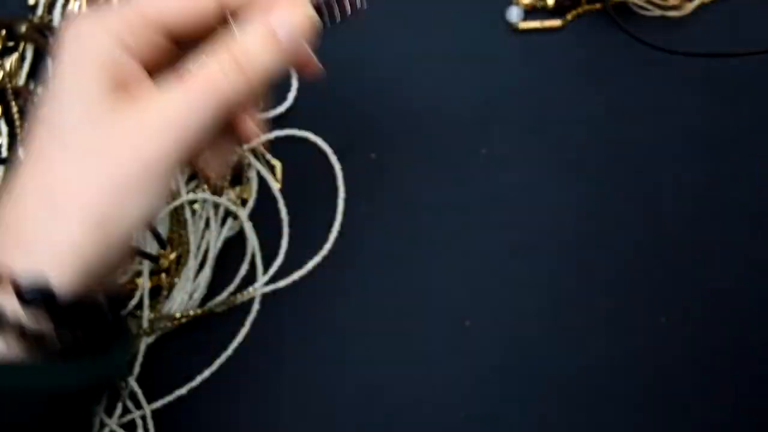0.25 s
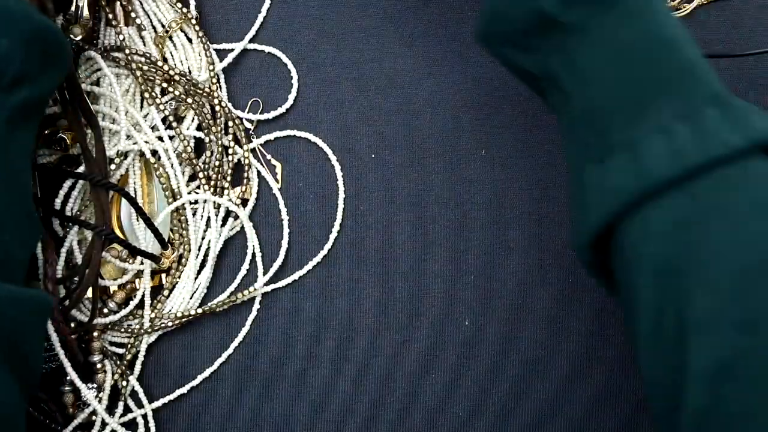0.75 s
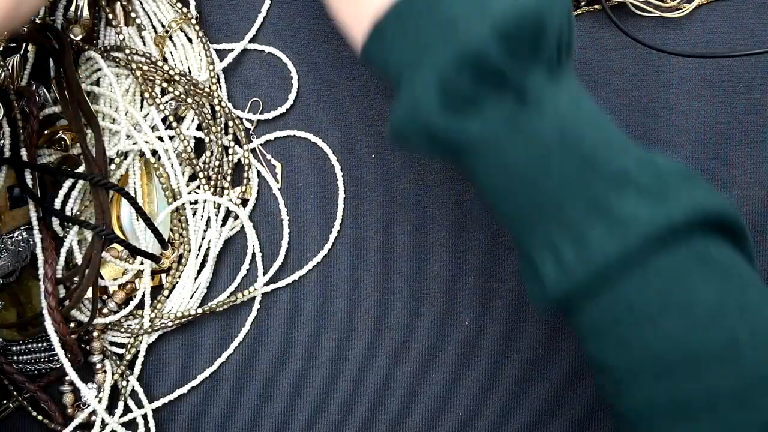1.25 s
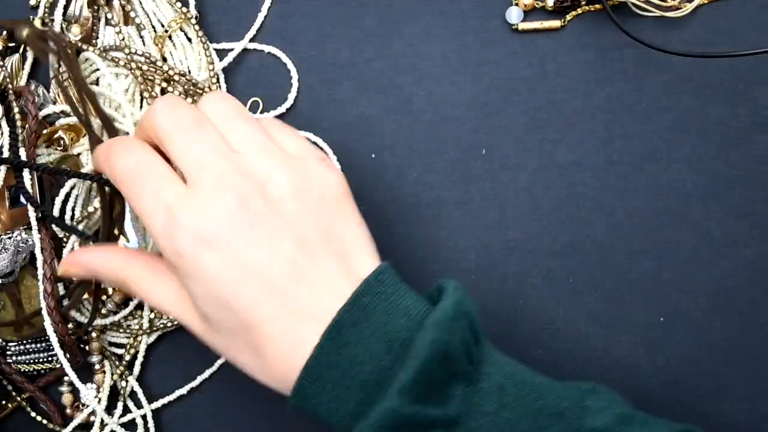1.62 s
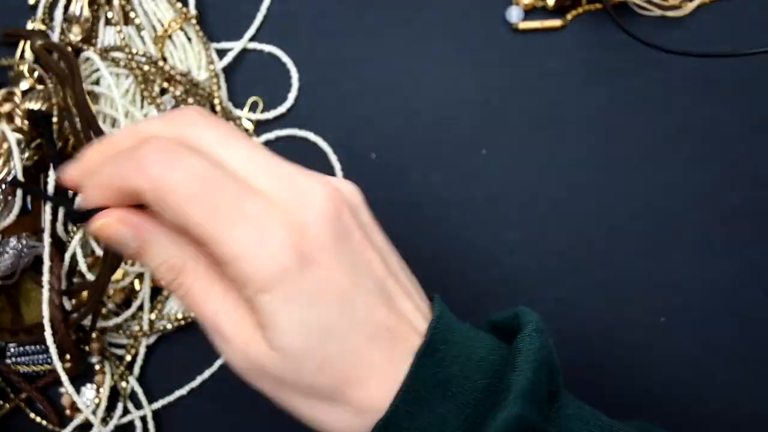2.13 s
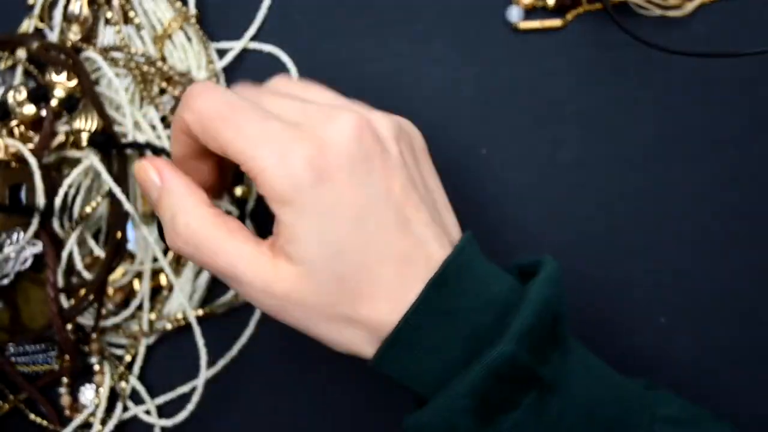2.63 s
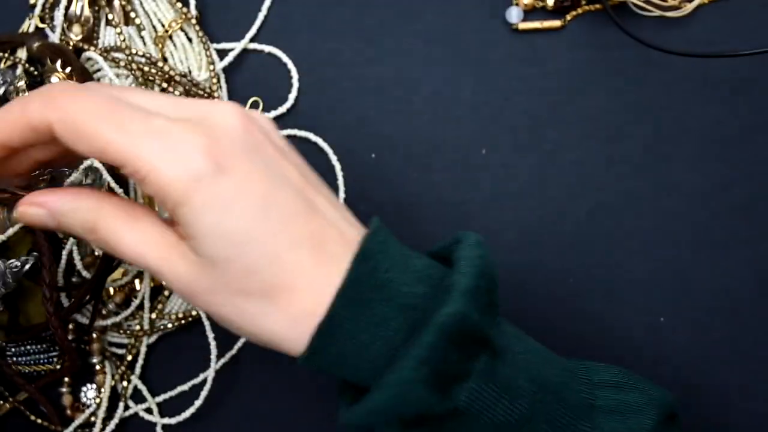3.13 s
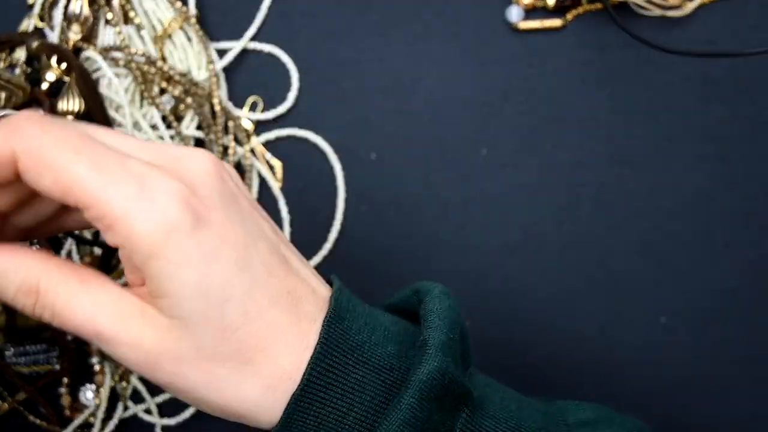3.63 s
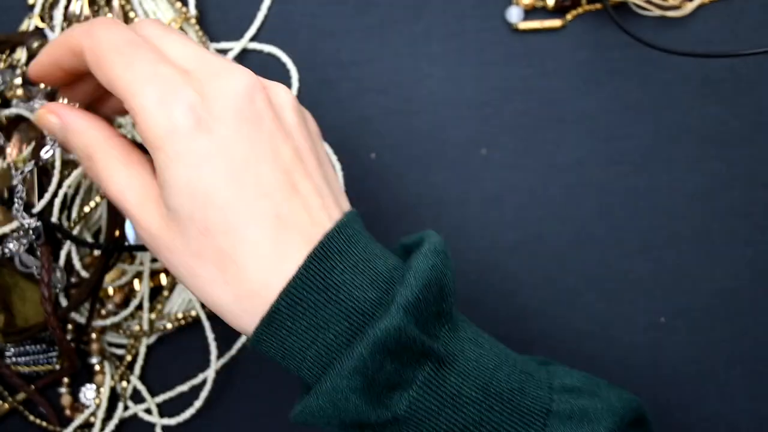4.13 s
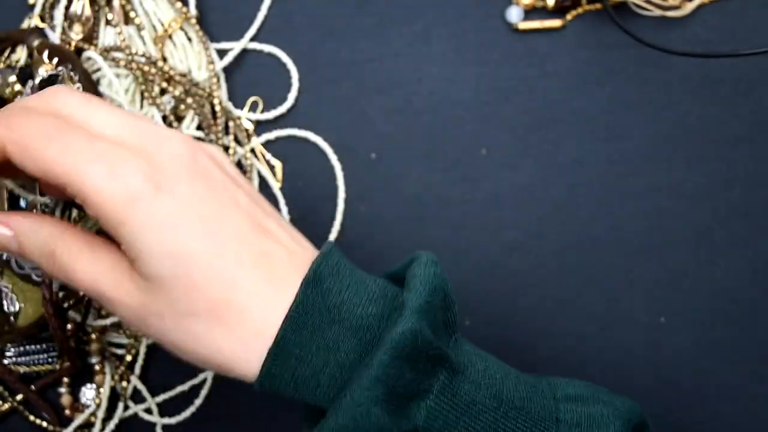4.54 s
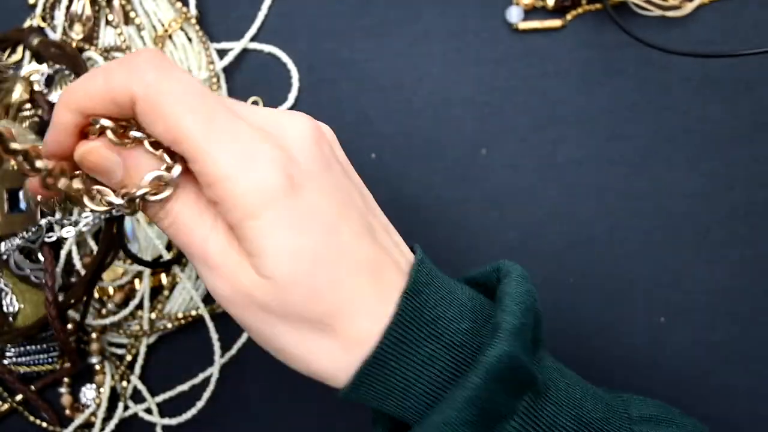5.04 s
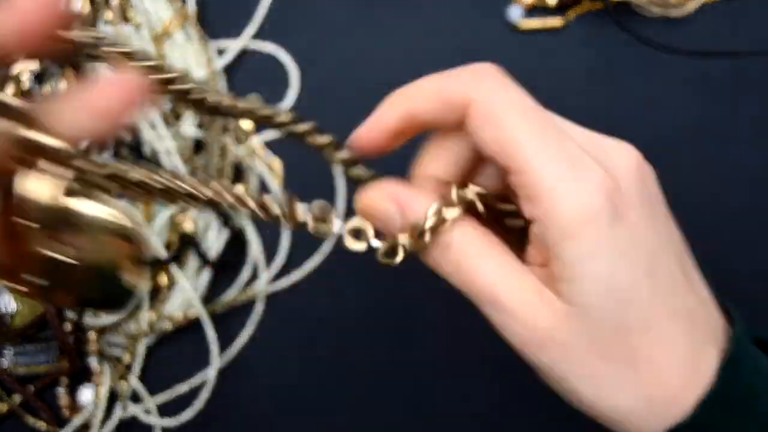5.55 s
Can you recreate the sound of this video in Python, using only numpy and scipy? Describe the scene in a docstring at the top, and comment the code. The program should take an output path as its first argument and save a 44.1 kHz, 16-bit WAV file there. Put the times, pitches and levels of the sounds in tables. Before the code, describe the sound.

Fine metal chains rustle and clink lightly, a few dull knocks echo farther off, then bright jewellery clinking grows strong and thins out.

```python
"""A hand rummages through a heap of chains and necklaces on a table, close by in a quiet room.
At first fine links rustle and clink lightly, and a very fine chain slithers with a grainy hiss.
Around one second something knocks farther off: short bursts of coloured noise with plenty of room echo.
From two seconds the clinks grow strong: damped tones with a dry tick, and a few free pieces ring longer.
Around 3.5 seconds the links of a heavy chain ring at several pitches; the end is sparser."""
import sys
import numpy as np
from scipy import signal
from scipy.io import wavfile
from scipy.ndimage import uniform_filter1d

SR = 44100
rng = np.random.default_rng(int(sys.argv[2]) if len(sys.argv) > 2 else 0)


def unload_audio(sound):
    """Save the sound as a 16-bit wav file, at the path given as the first command line argument."""
    columns = np.transpose(np.atleast_2d(sound))
    # keep every value between -1 and 1, then stretch to whole-number steps
    steps = np.round(np.clip(columns, -1, 1) * 32767)
    wavfile.write(sys.argv[1], SR, steps.astype(np.int16))


N = 254845  # length of the scene in samples

# tone colour of small links sliding and snapping: (frequency [Hz], relative level [dB])
SIZZLE_COLOUR = [(300, -65), (2000, -42), (5000, -27), (9500, -22), (10400, -9), (11400, -3), (12000, -4),
                 (13200, 0), (14300, -3), (15700, -7), (16500, -18)]


def amp(db):
    """Turns decibels into a factor for the wave's height."""
    return 10 ** (np.asarray(db) / 20)


def unit(x):
    """Scales a sound to an rms (average strength) of 1."""
    return x / np.sqrt(np.mean(x ** 2) + 1e-20)


def read(points, hz):
    """Reads between the points of a table, with frequency on a logarithmic scale."""
    table_hz, value = np.transpose(points)
    return np.interp(np.log(hz + 1), np.log(table_hz + 1), value)


def add(mix, start_s, sound):
    """Mixes a sound in at the given time, cutting off what runs past the end."""
    part = mix[max(round(start_s * SR), 0):][:len(sound)]
    part += sound[:len(part)]


def colour(x, points, size=2048):
    """Filters a sound to a tone colour without pre-echo; white noise keeps its overall power."""
    gain = unit(amp(read(points, abs(np.fft.fftfreq(size, 1 / SR)))))
    # the phase that goes with this gain puts the filter's response after each input sample
    spectrum = np.exp(np.conj(signal.hilbert(np.log(gain))))
    taps = np.fft.ifft(spectrum).real
    return signal.oaconvolve(x, taps[:size // 2])[:len(x)]


def fade(t, t60):
    """A vibration left alone dies away by 60 dB in t60 seconds."""
    return np.exp(-np.log(1000) * t / max(t60, 1e-3))


def ring(t, hz, t60):
    """One way a struck object vibrates: a fading sine that starts at a random point of its cycle."""
    return np.sin(2 * np.pi * (hz * t + rng.random())) * fade(t, t60)


def pull_shape(length):
    """A movement takes hold, lasts, is released, and settles as a few links go on slipping."""
    rise_s, release_t60 = 0.0078, 0.16
    settle_db, settle_t60 = -10.5, 0.89
    age = np.arange(round((length + 1) * SR)) / SR
    after = np.maximum(age - length, 0)
    settling = amp(settle_db) * fade(after, settle_t60)
    return np.minimum(age / rise_s, 1) * np.maximum(fade(after, release_t60), settling)


def motion():
    """Each pull of the fingers sets chains sliding; overlapping pulls add in power."""
    # pulls: (start [s], length [s], sizzle level [dB], rattle level against the sizzle [dB])
    pulls = [(0, 0.074, -49, -6.5), (0.137, 0.12, -51, -0.5), (0.293, 0.071, -52.5, -3),
             (.53, 0.056, -59.5, -0.5), (0.807, 0.12, -59, -2.5), (1.076, 0.16, -54.5, -6.5),
             (1.716, 0.069, -60, 0), (1.95, 0.17, -41, -7.5), (2.11, 0.26, -50.5, -2.5),
             (2.266, 0.098, -44.5, -4.5), (2.455, 0.071, -49, -7.5), (2.535, 0.052, -45.5, -7.5),
             (2.623, 0.013, -32, -7.5), (2.735, 0.037, -52.5, 3), (2.875, 0.13, -48.5, -6.5),
             (3.03, 0.015, -39, -3.5), (3.205, 0.046, -39.5, -4.5), (3.453, 0.081, -50, -3),
             (3.683, 0.11, -53, -4), (3.756, 0.079, -43, -2.5), (3.9, 0.16, -59, -1),
             (4.078, 0.12, -46, -1.5), (4.28, 0.17, -48, -9), (4.461, 0.099, -38, -12.5),
             (4.833, 0.34, -50.5, -8.5), (5.496, 0.083, -52, -23), (5.705, 0.049, -46, -16)]
    sizzle_power, rattle_power = np.zeros((2, N))
    for start, length, db, rattle_db in pulls:
        shape = pull_shape(length)
        add(sizzle_power, start, (amp(db) * shape) ** 2)
        add(rattle_power, start, (amp(db + rattle_db) * shape) ** 2)
    return np.sqrt(sizzle_power), np.sqrt(rattle_power)


def tiny_contacts(per_s, spread_db, lo_hz, hi_hz, t60, ringing, scrape_t60=0.0094, count=24):
    """Small links touch at random, unevenly hard: each a dry scrape with a trace of one link's pitch."""
    t, out = np.arange(SR // 25) / SR, np.zeros(N)
    happens = rng.random(N) < per_s / SR
    sizes = amp(spread_db * np.minimum(rng.exponential(1, N), 2.7)) * happens
    which_link = rng.integers(0, count, N)
    for k, hz in enumerate(np.linspace(lo_hz, hi_hz, count)):
        scrape = rng.standard_normal(len(t)) * fade(t, scrape_t60)
        contact = unit(scrape) + ringing * unit(ring(t, hz, t60))
        out += signal.oaconvolve(sizes * (which_link == k), contact)[:N]
    # even out the level over 40 ms, so that the motion alone shapes it later
    return out / np.sqrt(abs(uniform_filter1d(out ** 2, SR // 25)) + 1e-9)


def rustle(sizzle, rattle):
    """Fine chains slide over each other; beads and larger links rattle with the same motion."""
    # tone colour of the rattle: (frequency [Hz], relative level [dB])
    rattle_colour = [(1000, -17.5), (2200, -8), (3400, -5), (4500, 3.5), (6000, -2), (7300, 1.5), (8800, 7),
                     (10000, 6), (11500, -7)]
    contacts = tiny_contacts(per_s=650, spread_db=6.0, lo_hz=3493, hi_hz=15830, t60=0.035, ringing=0.62)
    fine = sizzle * unit(colour(contacts, SIZZLE_COLOUR))
    coarse = rattle * unit(colour(contacts, rattle_colour))
    return fine + coarse


def link(t, hz, lo_hz, hi_hz, t60, others, ring_t60=0.062, bounces_per_s=450, bounce=0.44, count=10):
    """A link rings, sets neighbours ringing between lo_hz and hi_hz, and chatters until it settles."""
    pitches, sizes, phases = rng.uniform(lo_hz, hi_hz, count), rng.rayleigh(1, count), rng.random(count)
    neighbours = sum(size * np.sin(2 * np.pi * (f * t + phase))
                     for f, size, phase in zip(pitches, sizes, phases))
    own = unit(np.sin(2 * np.pi * hz * t))
    tone = (own + others * unit(neighbours)) * fade(t, min(t60, ring_t60))
    chatter = bounce * (rng.random(len(t)) < bounces_per_s / SR) * fade(t, t60)
    struck = tone + signal.fftconvolve(chatter, tone)[:len(t)]
    return unit(struck) * np.sqrt(np.mean(fade(t, t60) ** 2))  # as strong as a plain fade


def clinks(rows, tick_db=-5, snap_db=-6, tick_t60=0.012, others=0.6, rise_s=0.00014, size_spread=0.015):
    """Each contact makes a dry tick and a bright snap, then a lower and an upper ring, quickly damped."""
    # kinds of link in the heap: (kind [name], typical lower ring pitch [Hz],
    # lower ring level against the upper ring [dB], time to fade by 60 dB [s])
    link_kinds = [("fine", 10000, -11.5, 0.032), ("pinched", 8920, -12, 0.0096),
                  ("plain", 8950, -1.54, 0.027), ("oval", 7250, -7.5, 0.016), ("curb", 6770, 4.1, .012),
                  ("bead", 4550, -1.5, 0.023), ("hollow", 3300, 0, .018)]
    # tone colour of the dry tick: (frequency [Hz], relative level [dB])
    tick_colour = [(100, -35), (1500, -5.5), (3200, -9), (4500, 12.5), (6000, 7.5), (9000, -31.5),
                   (12000, 2.5)]
    t = np.arange(SR // 12) / SR
    rings, ticks, snaps = np.zeros((3, N))
    for s, high_db, high_hz, kind in rows:
        low_hz, lower_db, t60 = next(row[1:] for row in link_kinds if row[0] == kind)
        low_db = high_db + lower_db
        # in the upper group all the neighbours share one pitch
        upper = amp(high_db) * link(t, high_hz, 12000, 12000, t60, others)
        lower = amp(low_db) * link(t, low_hz * rng.normal(1, size_spread), 6530, 9810, t60, others)
        add(rings, s, (upper + lower) * (1 - np.exp(-t / rise_s)))
        contact = rng.standard_normal(len(t)) * fade(t, tick_t60)
        add(ticks, s, amp(low_db + tick_db) * contact)
        add(snaps, s, amp(high_db + snap_db) * contact)
    no_bass = signal.butter(2, 2000, "highpass", fs=SR, output="sos")  # small links radiate no bass
    rings = signal.sosfilt(no_bass, rings)
    return rings + colour(ticks, tick_colour) + colour(snaps, SIZZLE_COLOUR)


def stray_clinks(sizzle, count=60, louder_db=3.5, spread_db=15, lo_hz=11600, hi_hz=15200):
    """Small links clink at random moments, on average harder where the chains move more strongly."""
    # kinds of link that may clink at random: kind [name]
    stray_kinds = ["fine", "pinched", "plain", "oval"]
    rows = []
    for when, size, pitch, kind in rng.random((count, 4)):
        motion_db = 20 * np.log10(sizzle[int(when * N)] + 1e-9)
        db = motion_db + louder_db + spread_db * (2 * size - 1)
        hz = np.interp(pitch, [0, 1], [lo_hz, hi_hz])
        rows.append((when * N / SR, db, hz, stray_kinds[int(kind * len(stray_kinds))]))
    return rows


def slither():
    """The finest chain makes thousands of contacts a second: a soft, grainy hiss."""
    # slithers: (start [s], length [s], level [dB])
    slithers = [(0, 0.28, -52), (0.497, 0.68, -63), (1.049, 0.17, -50)]
    # tone colour of the hiss: (frequency [Hz], relative level [dB])
    slither_colour = [(1500, -32), (3600, -23), (4700, -3), (6500, -16), (10000, -18), (11800, -3),
                      (13300, 1.5), (14300, -1.5), (15500, -16)]
    power = np.zeros(N)
    for start, length, db in slithers:
        add(power, start, (amp(db) * pull_shape(length)) ** 2)
    contacts = tiny_contacts(per_s=2700, spread_db=17, lo_hz=4020, hi_hz=15000, t60=0.027, ringing=0.12)
    return np.sqrt(power) * unit(colour(contacts, slither_colour))


def soft_onset(t, rise_s=0.0003):
    """A free piece takes a fraction of a millisecond to start ringing."""
    return 1 - np.exp(-t / rise_s)


def heavy_chain():
    """Blows on the heavy chain's links, which the heap does not damp, ring at several pitches."""
    # blows on the links: (time [s], level [dB])
    blows = [(1.784, -62), (3.474, -49), (3.495, -48), (3.518, -39.5), (3.585, -47.5), (3.608, -50),
             (3.971, -52), (4.002, -44), (5.033, -46), (5.541, -42), (5.761, -53)]
    # what a link rings with: (typical pitch [Hz], typical level against the blow [dB],
    # time to fade by 60 dB [s])
    modes = [(2630, -11, 0.044), (4540, 2.5, 0.019), (6860, 4.5, 0.049), (8930, -1, 0.079),
             (11670, 2, 0.067), (12560, -7, 0.049), (14820, -9, 0.12)]
    t, out = np.arange(SR // 2) / SR, np.zeros(N)
    for s, blow_db in blows:
        for hz, db, t60 in modes:
            # no two links are quite alike
            uneven_db, detune = rng.normal(0, 2), rng.normal(1, .003)
            add(out, s, amp(blow_db + db + uneven_db) * soft_onset(t) * ring(t, hz * detune, t60))
    return out


def pendants(twin=0.54):
    """Small pieces swing free of the heap; each lopsided one has two close pitches that beat."""
    # pieces: (time [s], main pitch [Hz], main pitch's level [dB], its time to fade by 60 dB [s])
    pieces = [(2.28, 7320, -29.5, 0.042), (2.322, 11600, -42, 0.21), (2.475, 10780, -42, .16),
              (2.632, 11670, -38, 0.15), (2.632, 8570, -24.5, 0.063), (2.634, 4270, -36, .044),
              (2.897, 11692, -37.5, 0.16), (3.038, 12575, -43, 0.14), (3.219, 12600, -39, .25),
              (3.232, 13500, -27, 0.12), (3.925, 10940, -40, .07), (4.002, 11600, -36, .057),
              (4.399, 11600, -26.5, 0.073), (4.422, 3500, -47, 0.046), (4.516, 13600, -23, 0.15),
              (4.517, 3450, -58, 0.15), (4.849, 9840, -50, 0.51), (5.181, 8500, -50, 0.18),
              (5.762, 3580, -49.5, .03)]
    t, out = np.arange(SR // 2) / SR, np.zeros(N)
    for s, hz, db, t60 in pieces:
        split = rng.uniform(1.003, 1.012)
        pair = ring(t, hz, t60) + twin * ring(t, hz * split, t60 / 2)
        add(out, s, amp(db) * soft_onset(t) * pair)
    return out


def knocks():
    """Short dull blows on wood, which radiates no deep bass: fading bursts of coloured noise."""
    # blows, before the bass is cut: (time [s], level [dB], time to fade by 60 dB [s])
    blows = [(0.8152, -33.5, 0.031), (.822, -38, 0.023), (0.845, -41, 0.025), (1.026, -42, 0.044),
             (1.0913, -31, 0.024), (1.162, -38, 0.03), (1.174, -37.5, 0.043)]
    # tone colour of the wood, before the bass is cut: (frequency [Hz], relative level [dB])
    wood_colour = [(50, -28), (100, -12), (150, -8), (260, -7), (340, 1), (600, -1.5), (780, -0.5),
                   (920, -4.5), (1250, -2.5), (1800, -6.5), (2450, -6.5), (3000, -11), (3600, -22),
                   (5000, -26), (8000, -45)]
    t, out = np.arange(SR // 8) / SR, np.zeros(N)
    for s, db, t60 in blows:
        wood = colour(rng.standard_normal(2 * len(t)), wood_colour)[len(t):]  # skip the filter's start
        blow = wood * fade(t, t60) * (1 - np.exp(-t / .0005))
        add(out, s, amp(db) * unit(blow) * np.sqrt(np.mean(fade(t, t60) ** 2)))
    no_bass = signal.butter(3, 115, "highpass", fs=SR, output="sos")
    return signal.sosfilt(no_bass, out)


def room(x, gap_s=0.0026, size=256):
    """Countless reflections blur into a noise-like tail whose treble dies first."""
    # echo: (frequency [Hz], time to fade by 60 dB [s])
    echo_times = [(150, .65), (500, .68), (1500, .64), (3000, .52), (8000, .33), (15000, .22)]
    taps = rng.standard_normal(SR) * (np.arange(SR) > gap_s * SR)
    hz, t, spectrum = signal.stft(taps, SR, nperseg=size)
    decay = amp(-60 * t / read(echo_times, hz)[:, None])
    tail = signal.istft(spectrum * decay, SR, nperseg=size)[1]
    return signal.fftconvolve(x, tail / np.linalg.norm(tail))[:N]


def hush(air_db=-64, drone_hz=212, drone_width_hz=40, drone_db=-78):
    """Quiet room air is coloured noise; a narrow band of noise adds a faint low drone."""
    # tone colour of the air: (frequency [Hz], relative level [dB])
    air_colour = [(15, -30), (25, -15), (188, -7.5), (274, -9), (631, -9.5), (1050, -11.5), (1710, -12),
                  (3440, -15.5), (4150, -15.5), (5730, -17), (6920, -16.5), (7500, -18.5), (8810, -19.5),
                  (10600, -18.5), (15500, -18)]
    narrow_band = signal.iirpeak(drone_hz, drone_hz / drone_width_hz, SR)
    drone = signal.lfilter(*narrow_band, rng.standard_normal(N))
    air = colour(rng.standard_normal(N), air_colour)
    return amp(air_db) * unit(air) + amp(drone_db) * unit(drone)


def scene(near_room_db=-13, far_room_db=-2.5, hiss_db=-73, hush_side_db=-20, far_side_db=-29, near_side_db=-25):
    """The jewellery is close and dry, the knocks far and echoing; the channels differ only slightly."""
    # the clearest clinks: (time [s], upper ring level [dB], upper ring pitch [Hz], kind of link [name])
    clear_clinks = [(.072, -47, 12170, "bead"), (.157, -47, 14880, "fine"), (.222, -36, 12600, "bead"),
                    (.2974, -41.5, 13300, "bead"), (.3602, -28.5, 12960, "pinched"),
                    (.5753, -42, 13450, "plain"), (.635, -47, 13500, "oval"),
                    (1.0927, -44.5, 13300, "bead"), (1.1784, -43.5, 13400, "plain"),
                    (1.277, -36, 13900, "pinched"), (1.7452, -40, 13600, "pinched"),
                    (1.78, -43, 14800, "hollow"), (1.961, -44, 15500, "hollow"),
                    (2.0065, -31, 11400, "fine"), (2.0226, -30.5, 10800, "bead"),
                    (2.0599, -26, 11100, "oval"), (2.1115, -52, 12550, "fine"),
                    (2.1534, -29, 14440, "fine"), (2.2343, -40, 12700, "fine"),
                    (2.2782, -26, 14400, "plain"), (2.3228, -32, 12560, "fine"),
                    (2.5477, -28.5, 12900, "plain"), (2.562, -31.5, 13800, "plain"),
                    (2.58, -26.5, 12700, "fine"), (2.631, -24, 12600, "fine"),
                    (2.6438, -31.5, 11800, "plain"), (2.6627, -24, 12600, "pinched"),
                    (2.7133, -20.5, 12800, "pinched"), (2.7228, -29, 13500, "pinched"),
                    (2.749, -25, 13080, "plain"), (2.7692, -28, 13600, "plain"),
                    (2.7822, -12, 13450, "pinched"), (2.8643, -22.5, 13600, "pinched"),
                    (2.909, -34, 12600, "plain"), (3.0036, -28.5, 14600, "fine"),
                    (3.0394, -26.5, 10870, "fine"), (3.0534, -26, 11700, "fine"),
                    (3.19, -35.5, 14810, "fine"), (3.217, -18, 12600, "oval"), (3.2344, -23, 12460, "fine"),
                    (3.405, -41, 12790, "curb"), (3.419, -38.5, 11610, "curb"),
                    (3.5466, -35, 12600, "curb"), (3.6085, -34, 13700, "fine"),
                    (3.6832, -28.5, 12700, "pinched"), (3.7452, -35, 12700, "plain"),
                    (3.7664, -27, 15200, "plain"), (3.8152, -27, 14600, "oval"),
                    (3.919, -38, 13300, "bead"), (3.9702, -34.5, 12560, "bead"),
                    (4.0016, -31, 11530, "fine"), (4.0727, -24.5, 13060, "oval"),
                    (4.1627, -32, 12970, "plain"), (4.2652, -26, 13000, "plain"),
                    (4.3372, -31.5, 12100, "oval"), (4.3852, -40, 10700, "plain"),
                    (4.3984, -27, 13600, "fine"), (4.4217, -24.5, 11670, "pinched"),
                    (4.4647, -36, 14900, "plain"), (4.4786, -31, 13050, "oval"),
                    (4.4925, -27.5, 13900, "oval"), (4.5154, -19, 12460, "fine"),
                    (4.519, -29, 13300, "plain"), (4.5432, -28, 13500, "oval"),
                    (4.841, -31, 13500, "pinched"), (4.907, -35, 13100, "oval"),
                    (4.9377, -32, 14000, "pinched"), (5.0322, -34.5, 11400, "curb"),
                    (5.1262, -30, 13200, "pinched"), (5.1792, -38, 11340, "plain"),
                    (5.282, -47, 13000, "pinched"), (5.3254, -43, 11500, "curb"),
                    (5.442, -52, 14730, "curb"), (5.5077, -32, 14900, "oval"), (5.539, -38, 13340, "curb"),
                    (5.5475, -33.5, 15000, "curb"), (5.7162, -30, 15700, "pinched"),
                    (5.7294, -26, 13000, "pinched"), (5.7624, -39.5, 11520, "bead")]
    # tone colour of the faint side signal: (frequency [Hz], relative level [dB])
    side_colour = [(200, 52), (1400, 51.5), (3000, -38), (7000, -15.5), (14000, -73)]
    sizzle, rattle = motion()
    metal = clinks(clear_clinks + stray_clinks(sizzle)) + rustle(sizzle, rattle)
    metal += slither() + heavy_chain() + pendants()
    far = knocks()

    mono = metal + amp(near_room_db) * room(metal)
    mono += far + amp(far_room_db) * room(far) + hush()
    # the side signal is added on the left and subtracted on the right
    side = amp(hush_side_db) * hush() + amp(far_side_db) * room(far)
    side += amp(near_side_db) * colour(room(metal), side_colour)
    hiss = amp(hiss_db) * rng.standard_normal((2, N))
    return np.array([mono + side, mono - side]) + hiss


def record(dry):
    """A steep low-pass filter ends the sound at about 16 kHz."""
    taps = signal.firwin(511, 16050, window=("kaiser", 9), fs=SR)
    return signal.oaconvolve(dry, taps[None], "same", axes=1)


dry = scene()
out = record(dry)
unload_audio(out)
```